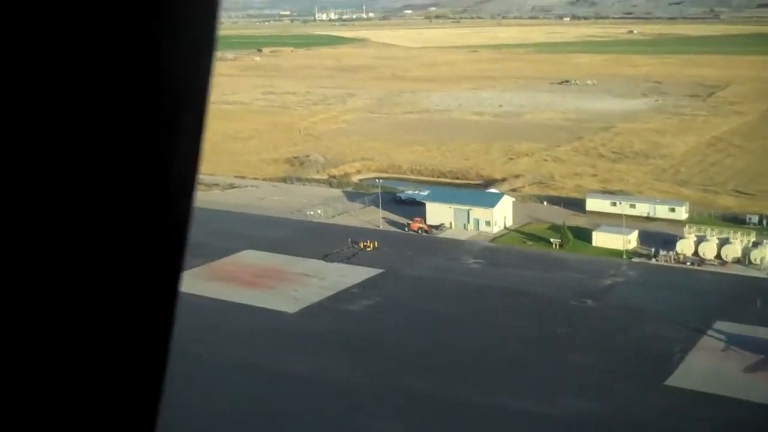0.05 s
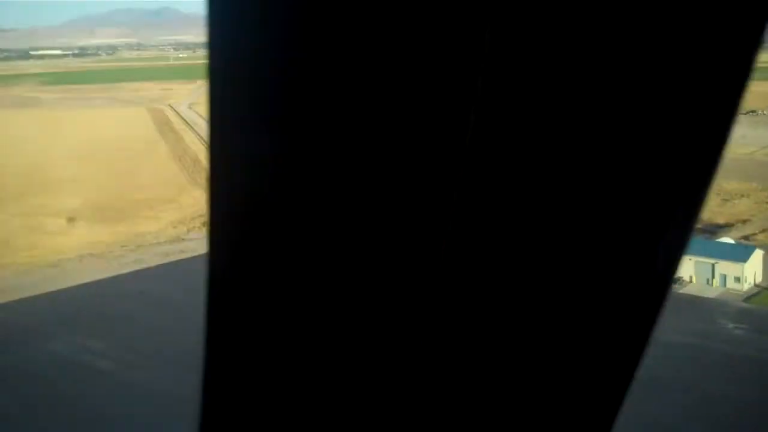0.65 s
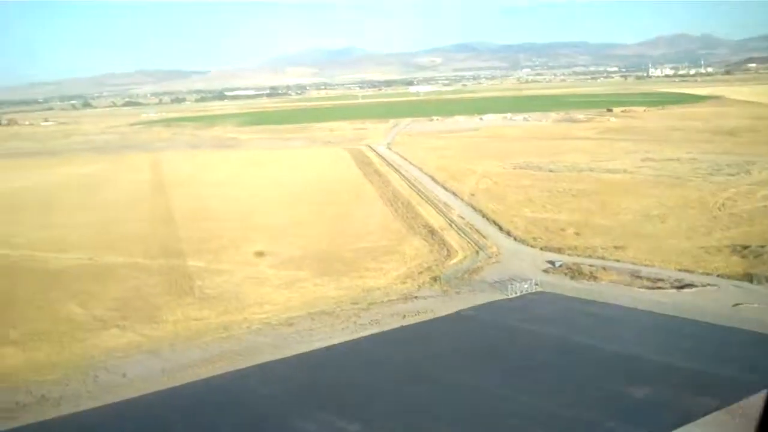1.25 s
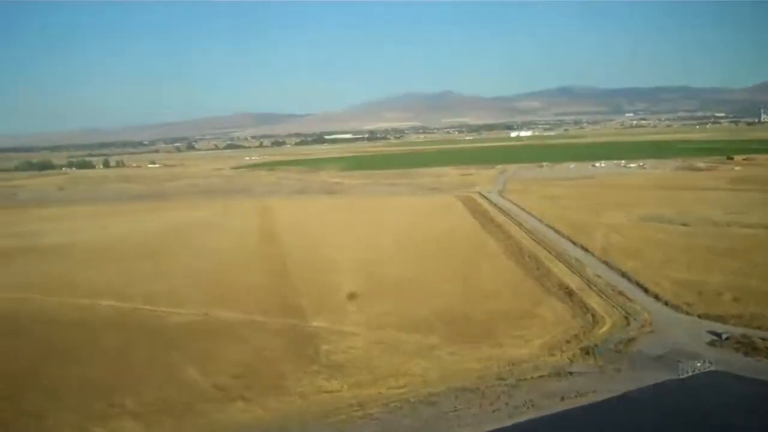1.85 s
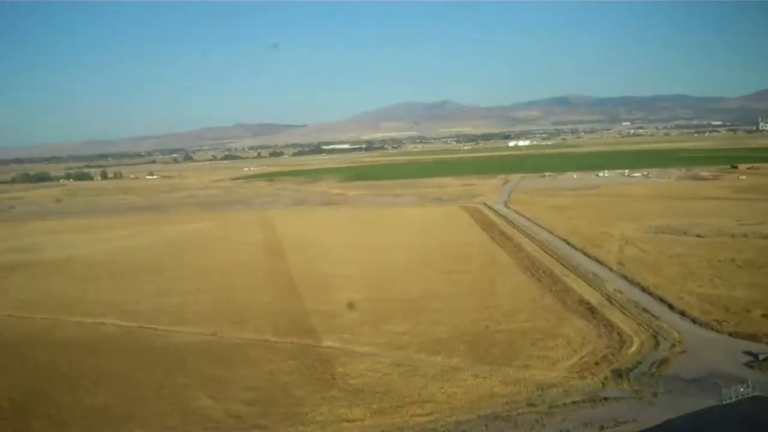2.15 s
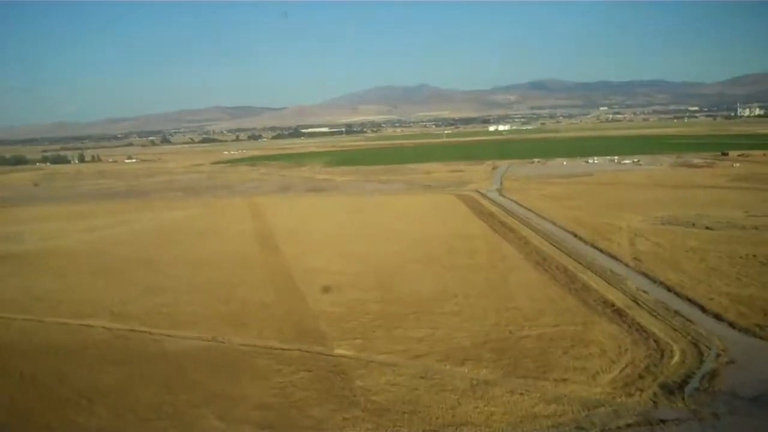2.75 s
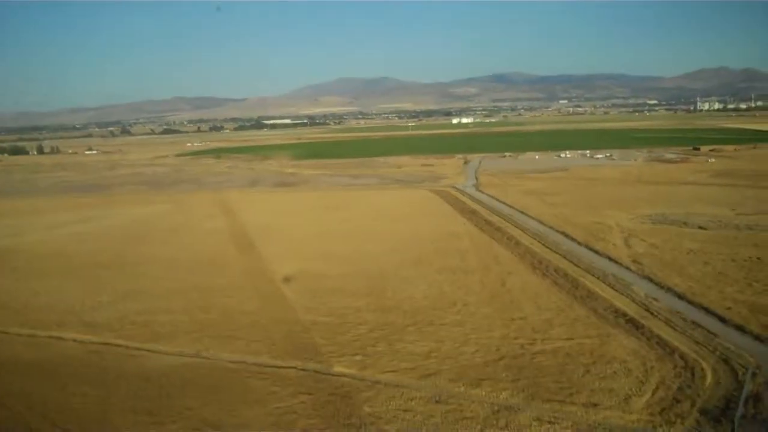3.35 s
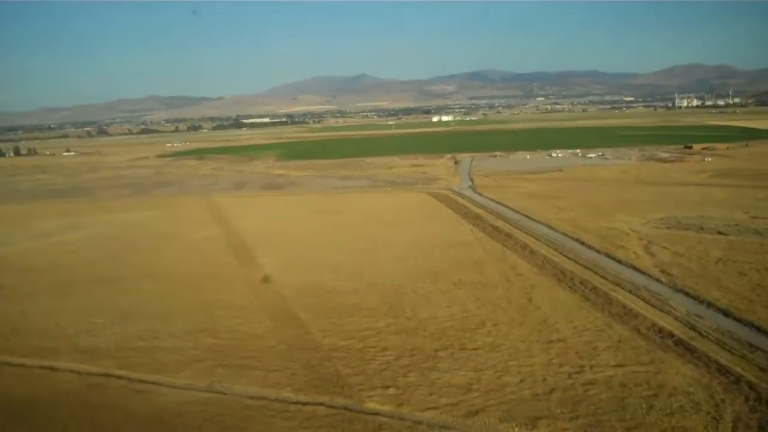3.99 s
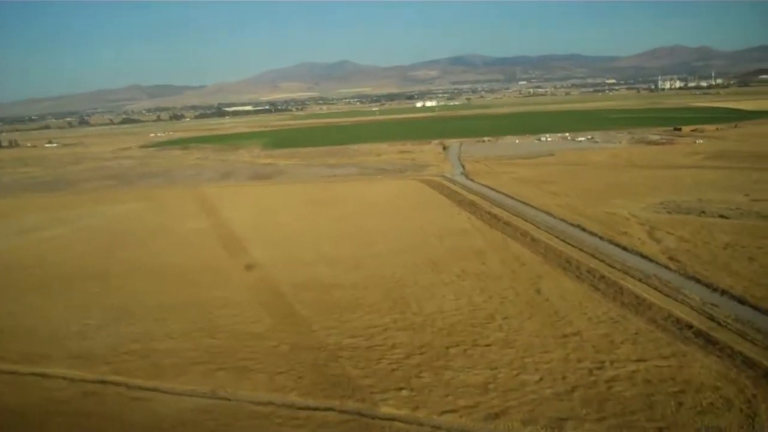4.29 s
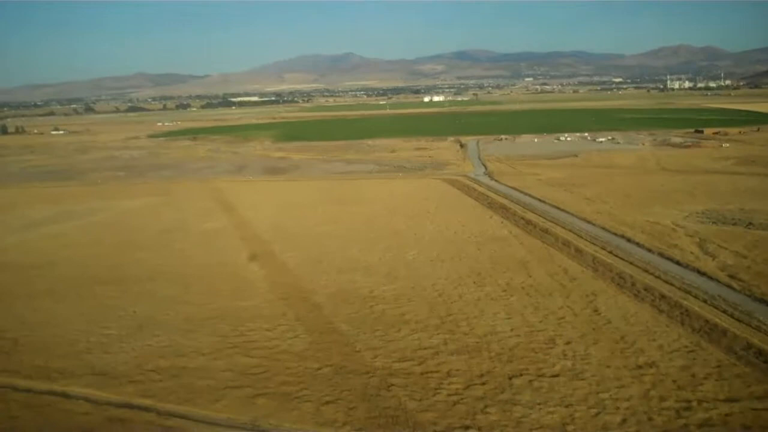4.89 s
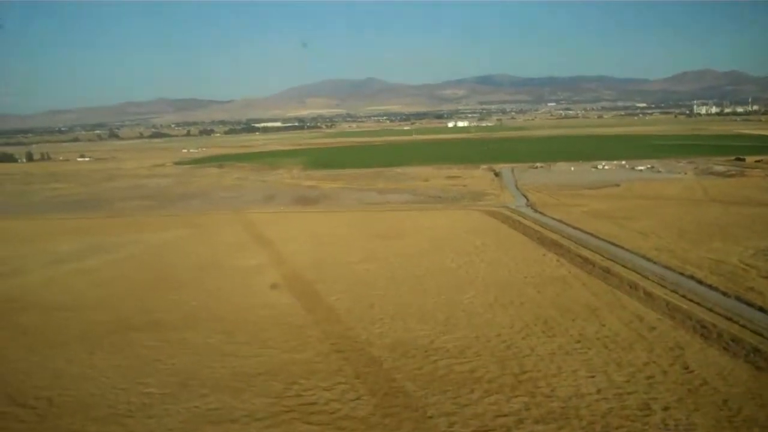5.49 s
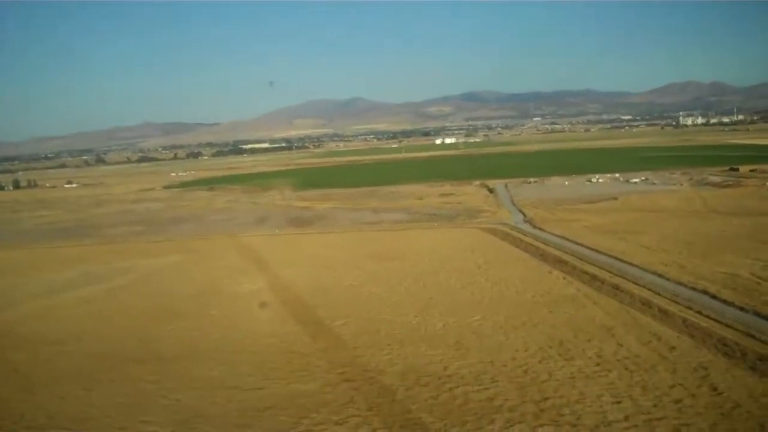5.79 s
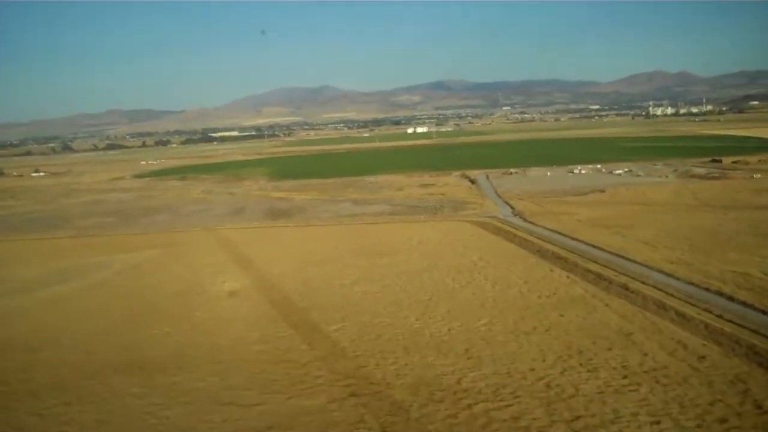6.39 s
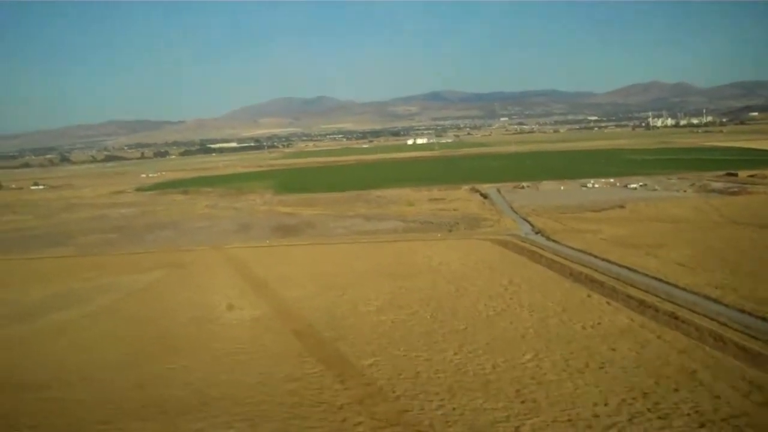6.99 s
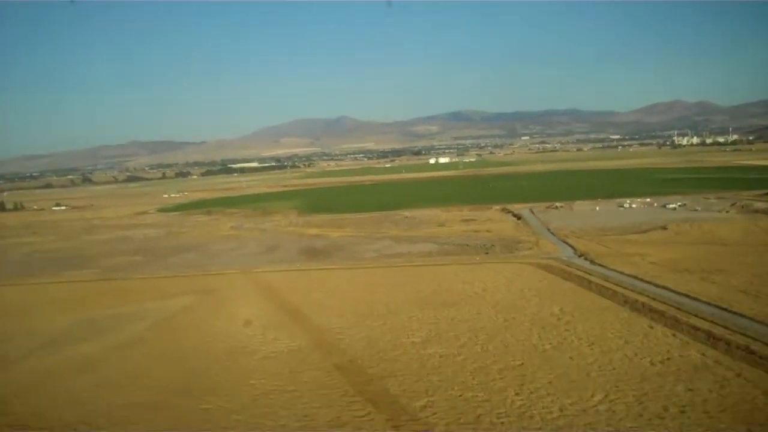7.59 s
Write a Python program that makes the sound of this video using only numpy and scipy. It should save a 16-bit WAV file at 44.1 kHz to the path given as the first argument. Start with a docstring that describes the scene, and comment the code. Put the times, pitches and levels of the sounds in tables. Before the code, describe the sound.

Steady low drone of a helicopter in flight, heard from inside, while air hisses and whistles through a door leak.

```python
"""Piston helicopter cabin, climbing

A light helicopter climbs away and gathers speed. Its six-cylinder engine drones over the main and
tail rotors, the gearbox and the dull roar of shaken panels. Air hisses past the door, where a leak
whistles, warbles at each blade pass and flips between two notes. Early on the microphone turns and
the door moves to the right; now and then the whole level dips briefly."""
import sys
import numpy as np
from scipy import signal
from scipy.fft import rfft, irfft
from scipy.io import wavfile
from scipy.ndimage import uniform_filter1d, map_coordinates

SR = 44100
rng = np.random.default_rng(int(sys.argv[2]) if len(sys.argv) > 2 else 0)


def output_pcm(signal):
    """Save a mono or channel-first signal as 16-bit PCM at the path in sys.argv[1].

    Samples are clipped to [-1, 1] before scaling.
    """
    pcm = np.clip(np.atleast_2d(signal).T, -1, 1) * 32767
    wavfile.write(sys.argv[1], SR, np.round(pcm).astype(np.int16))


N = 336924
TIME = np.arange(N) / SR
BIN_HZ = np.maximum(np.arange(N // 2 + 1) * SR / N, 1)


def from_db(db):
    """Decibels to gain."""
    return 10 ** (np.asarray(db) / 20)


def over_time(points):
    """An automation curve, read at every sample."""
    return np.interp(TIME, *np.transpose(points))


def over_frequency(points):
    """A curve over log frequency, read at every bin."""
    hz, value = np.transpose(points)
    return np.interp(np.log(BIN_HZ), np.log(hz), value)


def mic_turn(before, after, turn_s=1.67):
    """A setting that glides, then holds, as the microphone swings to face the side window."""
    return np.interp(TIME, [0, turn_s], [before, after])


def drift(rate_hz):
    """Random wander with a spread of 1, rolling off above rate_hz."""
    slow = irfft(rfft(rng.standard_normal(N)) / (1 + (BIN_HZ / rate_hz) ** 2), N)
    return (slow - slow.mean()) / slow.std()


def running_phase(hz):
    """Phase in radians of something that cycles at a changing rate."""
    return 2 * np.pi * np.cumsum(hz) / SR


def pan(right_db):
    """Left and right gains at constant power."""
    sides = from_db(right_db * np.array([[-.5], [.5]]))
    return sides / np.sqrt(np.mean(sides ** 2, axis=0))


def stereo_noise(likeness):
    """Spectra of two partly alike white noises, 0 dB per Hz."""
    alike = over_frequency(likeness)
    mid, side = rfft(rng.standard_normal((2, N))) * np.sqrt(SR) / 2
    return np.sqrt(1 + alike) * mid + np.sqrt(1 - alike) * side * [[1], [-1]]


def partial(phase, db, waver_db, waver_rad):
    """One tone of a rotating part, unsteady in strength and timing."""
    wander = rng.uniform(0, 2 * np.pi) + waver_rad * drift(2.5)
    return np.sqrt(2) * from_db(db + waver_db * drift(2.4)) * np.sin(phase + wander)


def blade_pulse(blade, peakiness=.23):
    """Pressure over one blade pass: a short crest and a long trough."""
    return np.sin(blade) - peakiness * np.cos(2 * blade)


# The dull bed of airframe and cabin air. Each row: frequency in Hz, noise level in dB.
ROAR_SPECTRUM = [(12, -70), (22, -52), (58, -48), (90, -52), (135, -45.5), (205, -46), (260, -51),
                 (380, -54.5), (445, -56.5), (498, -58), (550, -58.5), (800, -64.5), (950, -68.5),
                 (2000, -72.5), (4000, -80)]
# Where the roar leans. Each row: frequency in Hz, right over left in dB.
ROAR_BALANCE = [(20, 4), (80, 4), (350, -1.5), (700, 1.5), (1400, -0.2)]
# Narrow lows, wider highs. Each row: frequency in Hz, left-right likeness from 0 to 1.
ROAR_LIKENESS = [(25, .93), (80, 0.89), (200, 0.96), (500, 0.91), (1000, 0.69), (1700, 0.67), (3000, 0.5)]


def panel_roar(cycle, blade, firing_depth=.15, blade_depth=.032, flutter_db=.93):
    """Panels shaken by exhaust and downwash: dull noise that throbs at the firing and blade rates."""
    colour_db = over_frequency(ROAR_SPECTRUM) + over_frequency(ROAR_BALANCE) * [[-.5], [.5]]
    colour = from_db(colour_db) / np.hypot(1, (BIN_HZ / 4500) ** 4)
    noise = irfft(stereo_noise(ROAR_LIKENESS) * colour, N)
    throb = 1 + firing_depth * np.cos(6 * cycle) - blade_depth * blade_pulse(blade)
    return noise * throb * from_db(flutter_db * drift(12))


# The colour of the door hiss on each side. Each row: frequency in Hz, noise level in dB.
HISS_LEFT = [(800, -84), (2000, -77.5), (2500, -73.5), (3700, -74), (4900, -76), (5700, -78), (6600, -75.5),
             (8000, -71), (9000, -77.5), (10000, -82), (11500, -92), (13100, -88.5), (14000, -94.5)]
HISS_RIGHT = [(800, -87.5), (2000, -74.5), (2500, -72.5), (3700, -73), (4900, -74), (5700, -72),
              (6450, -65), (7100, -75), (8000, -80.5), (10000, -92.5), (11800, -103), (13000, -100),
              (14000, -112)]
# The hiss is wide throughout. Each row: frequency in Hz, left-right likeness from 0 to 1.
HISS_LIKENESS = [(2500, 0.13), (6000, 0.17), (8000, .15), (12000, .08)]


def slipstream(blade, gust_db=.85, flutter_db=.84, split_hz=7000):
    """Air rushes past the door seal, harder under each blade; it dulls as the microphone turns."""
    hiss = stereo_noise(HISS_LIKENESS) * from_db([over_frequency(HISS_LEFT), over_frequency(HISS_RIGHT)])
    low_share = 1 / (1 + (BIN_HZ / split_hz) ** 8)
    tilt = from_db(mic_turn(3, 0))
    air = irfft(hiss * low_share, N) / tilt + irfft(hiss * (1 - low_share), N) * tilt
    return air * from_db(gust_db * blade_pulse(blade) + flutter_db * drift(25))


# Gearbox hum and whine. Each row: pitch in Hz at the opening engine speed, level in dB.
DRIVE_TONES = [(118.4, -35.5), (491.2, -48.5), (1157.7, -53), (2247, -61.5)]


def drive_train(cycle):
    """Shafts, fan and gears: tones geared to the engine."""
    opening_speed = ENGINE_SPEED[0][1]
    return sum(partial(cycle * hz / opening_speed, db, waver_db=2.5, waver_rad=.57)
               for hz, db in DRIVE_TONES)


# Main rotor thrum and tail rotor buzz. Each row: multiple of that rotor's blade rate, level in dB.
MAIN_HARMONICS = [(1, -38), (2, -49), (3, -38.5), (4, -34.5), (5, -38.5)]
TAIL_HARMONICS = [(1, -40), (2, -36.5), (3, -42.5), (6, -43)]


def rotor(blade, harmonics):
    """Each passing blade presses on the cabin, making a stack of harmonics."""
    return sum(partial(k * blade, db, waver_db=3, waver_rad=.083) for k, db in harmonics)


# Spells of airflow that hold the leak on its upper (+) or lower (-) note.
# Each row: start in seconds, end in seconds, push toward the flip in Hz.
AIRFLOW_SPELLS = [(3.15, 3.71, 210), (3.71, 4.58, -120), (4.58, 5.3, 210), (6.63, 7.01, 200)]


def note_flips(note_hz, flip_hz=3440, eddy_hz=105, eddies_per_s=10):
    """Eddies push the leak past flip_hz, more often at speed: 1 on the upper note, 0 on the lower."""
    held_hz = sum(push * ((TIME > start) & (TIME <= end)) for start, end, push in AIRFLOW_SPELLS)
    flipped = note_hz + held_hz + eddy_hz * drift(eddies_per_s) > flip_hz
    return uniform_filter1d(flipped.astype(float), size=900)  # a 20 ms crossfade


# The whistle climbs with airspeed. Each row: time in seconds, pitch of the lower note in Hz.
LEAK_PITCH = [(0, 3190), (1.3, 3258), (2.1, 3225), (5.6, 3440), (7.64, 3425)]
# How strongly it sings. Each row: time in seconds, level of the lower note in dB.
LEAK_LEVEL = [(0, -41.5), (.9, -34), (2.2, -36), (3.4, -36), (3.85, -30), (4.5, -35.5), (4.9, -37),
              (7.64, -42)]
# The breath around it. Each row: multiple of the lower note, width in Hz, level in dB.
BREATH_MODES = [(.895, 132, -44), (1.035, 79.7, -45), (1.17, 80, -49), (1.41, 110, -56.5), (4, 350, -70)]


def leak_whistle(blade, air_db, warble_hz=40, warble_db=1.5, upper_ratio=1.171, upper_db=-3):
    """An edge tone in the door leak: it rises between blades and sings one of two notes at a time."""
    note_hz = over_time(LEAK_PITCH)
    suction = blade_pulse(blade + np.pi)
    jitter_hz = 13 * drift(40.6) + 15 * drift(500)  # a quiver and a rough edge
    phase = running_phase(note_hz + warble_hz * suction + jitter_hz)
    upper = note_flips(note_hz)
    tone = (1 - upper) * np.sin(phase) + upper * from_db(upper_db) * np.sin(upper_ratio * phase)
    # the other modes never lock in: narrow bands of noise that follow the note
    breath = sum(from_db(db) * (drift(width) * np.sin(k * phase) + drift(width) * np.cos(k * phase))
                 for k, width, db in BREATH_MODES)
    flutter_db = 2.1 * drift(33)
    swell = from_db(over_time(LEAK_LEVEL) + warble_db * suction + flutter_db)
    return np.sqrt(2) * tone * swell + breath * from_db(air_db)


def place_door(hiss, whistle):
    """As the microphone turns, the whistle pans right and all the door's sound reaches the left later."""
    left, right = hiss + whistle * pan(right_db=mic_turn(-8.5, 5))
    lag_s = mic_turn(-.00003, .00011)
    lagged_left = map_coordinates(left, [(TIME - lag_s) * SR], order=3, mode="nearest")
    return np.array([lagged_left, right])


# The engine drone. Each row: multiple of the engine cycle rate, level in dB.
ENGINE_HARMONICS = [(2, -46), (4, -40.5), (5, -34), (6, -10.5), (7, -39), (8, -37), (9, -32.5), (12, -39.5),
                    (13, -50.5), (14, -36), (15, -48.5), (17, -36), (19, -46.5), (20, -41.5), (21, -48.5),
                    (22, -32), (24, -51), (25, -54), (29, -49), (34, -55.5), (35, -54), (46, -54),
                    (47, -62), (48, -56.5)]


def engine(cycle, cylinders=6):
    """The firing tone booms steadily; unequal cylinders add the other harmonics, which waver more."""
    boom = partial(cylinders * cycle, dict(ENGINE_HARMONICS)[cylinders], waver_db=-.12, waver_rad=.026)
    growl = sum(partial(k * cycle, db, waver_db=1.54, waver_rad=.21)
                for k, db in ENGINE_HARMONICS if k != cylinders)
    return boom + growl


# The pace of the machine. Each row: time in seconds, engine cycles (two crank turns) per second.
ENGINE_SPEED = [(0, 22.655), (4.7, 22.67), (5.9, 22.70), (7.3, 22.61), (7.64, 22.61)]
# The slow swell of wind on the cabin. Each row: time in seconds, level change in dB.
WIND_SWELL = [(0, -0.5), (2.8, .5), (3.2, -1), (3.85, 1.8), (4.3, 0.2), (5.9, 1), (6.55, 0), (7.3, 0.9)]


def scene(main_passes_per_cycle=.5972, tail_passes_per_cycle=3.556):
    """One engine speed turns everything; the door air, the roar and the engine ride the wind's swell."""
    wind_db = over_time(WIND_SWELL)
    engine_db = .07 - .1038 * TIME + .49 * wind_db  # the boom eases as the climb goes on
    roar_db = mic_turn(-1.5, -.3) + 1.1 * wind_db
    air_db = mic_turn(-2.6, 0) + wind_db
    cycle = running_phase(over_time(ENGINE_SPEED))
    blade = main_passes_per_cycle * cycle
    rotors = rotor(blade, MAIN_HARMONICS) + rotor(tail_passes_per_cycle * cycle, TAIL_HARMONICS)
    machine = from_db(engine_db) * engine(cycle) + drive_train(cycle) + rotors
    cabin = machine * pan(right_db=1.24) + from_db(roar_db) * panel_roar(cycle, blade)
    return cabin + place_door(from_db(air_db) * slipstream(blade), leak_whistle(blade, air_db))


# Brief ducks of the whole mix. Each row: start in seconds, level change in dB.
LEVEL_DIPS = [(1.104, -8), (2.971, -4.5), (3.48, -2), (4.047, -8.5), (4.573, -3.5), (5.162, -3.5),
              (7.082, -3.5), (7.48, -8.5)]


def record(dry):
    """Now and then the level drops at once, holds and climbs back at a steady rate; the top is cut."""
    half_fall_s, hold_s, recovery_db_per_s, cutoff_hz = .005, .049, 63, 14150
    dips_db = np.zeros(N)
    for start, db in LEVEL_DIPS:
        recovered_s = hold_s + abs(db) / recovery_db_per_s
        dips_db += np.interp(TIME - start, [-half_fall_s, half_fall_s, hold_s, recovered_s], [0, db, db, 0])
    top_cut = signal.ellip(12, .1, 90, cutoff_hz, fs=SR, output="sos")
    return signal.sosfilt(top_cut, dry * from_db(dips_db))


dry = scene()
out = record(dry)
output_pcm(out)
```